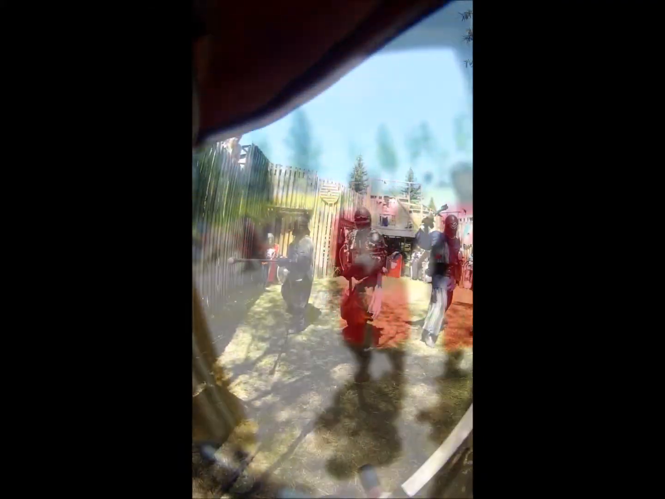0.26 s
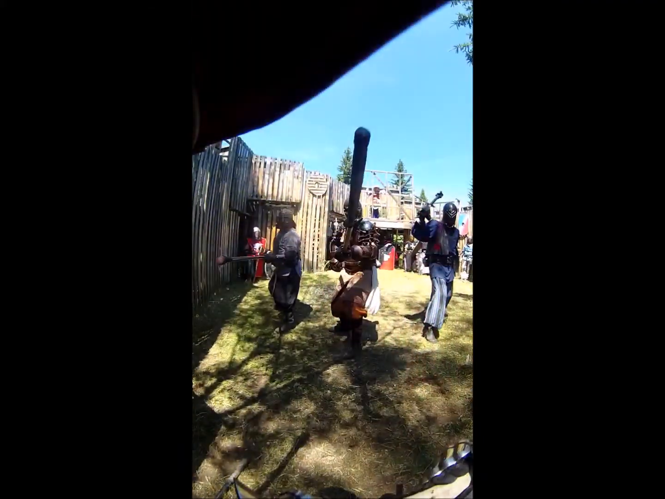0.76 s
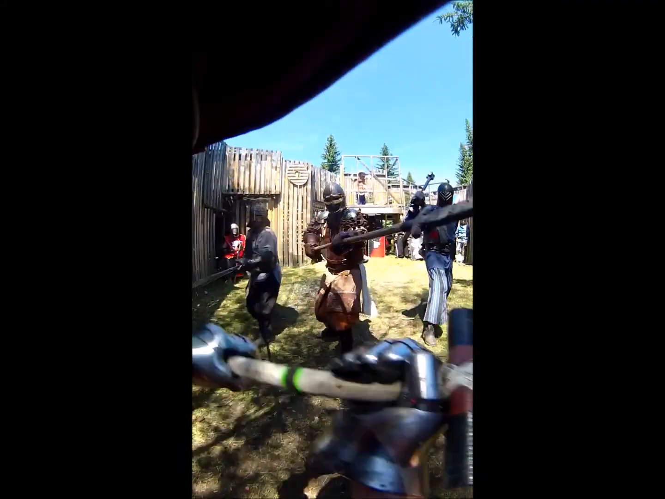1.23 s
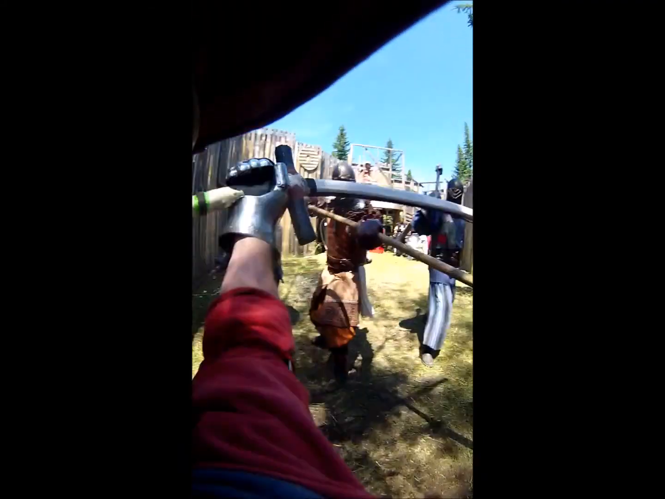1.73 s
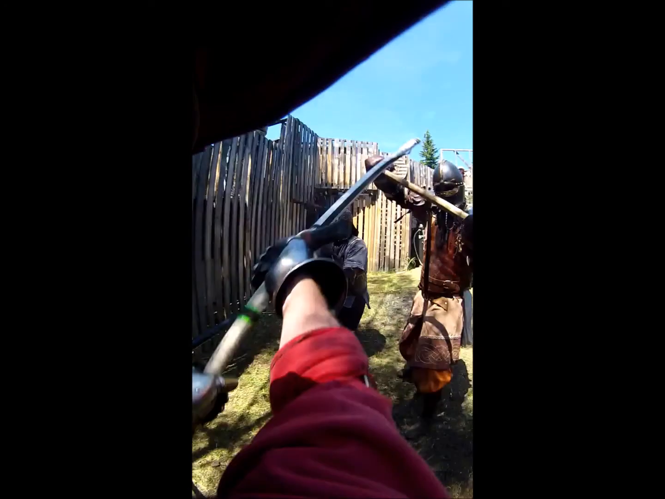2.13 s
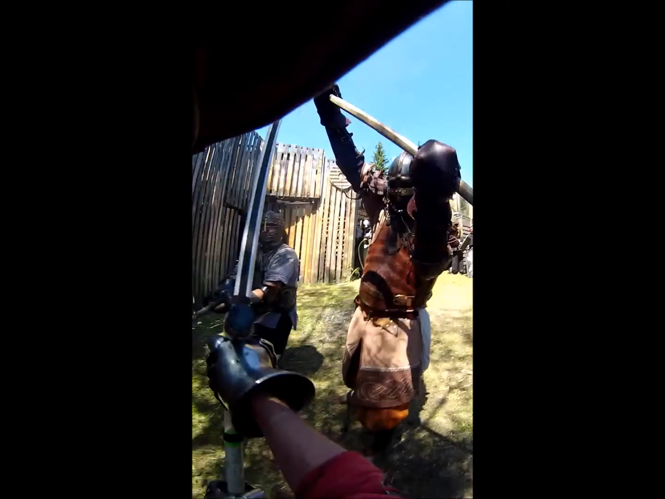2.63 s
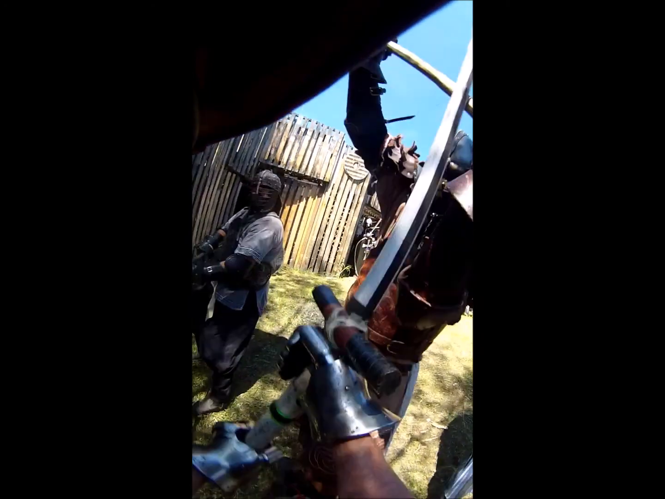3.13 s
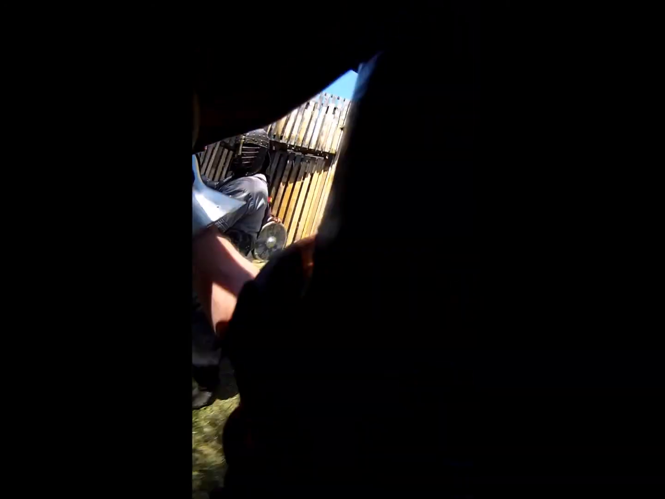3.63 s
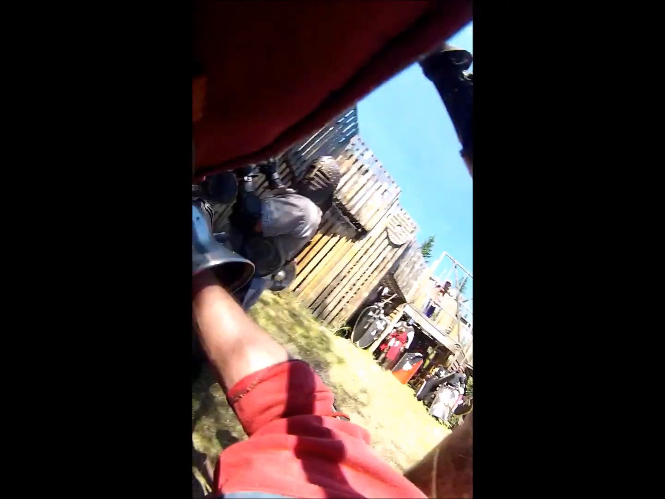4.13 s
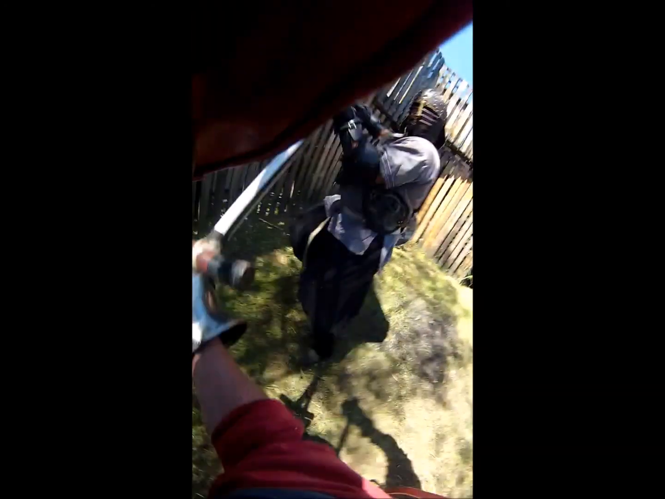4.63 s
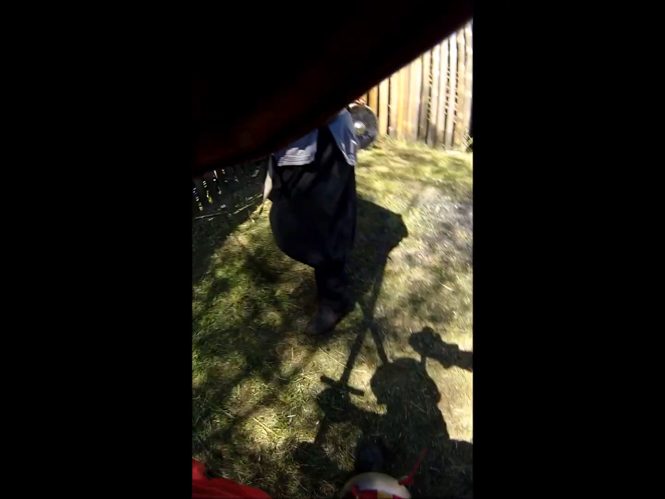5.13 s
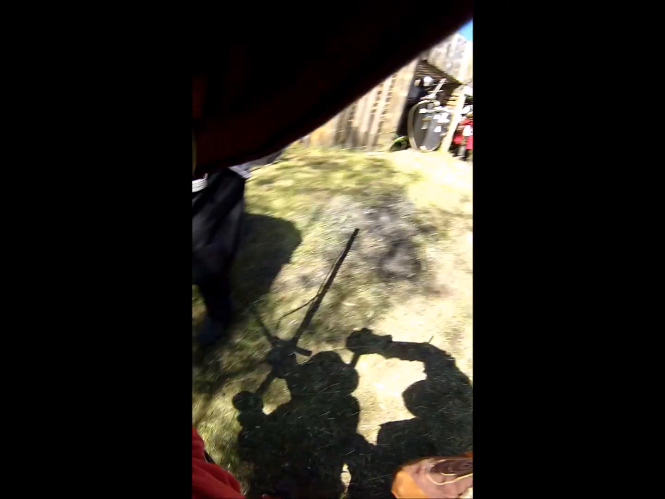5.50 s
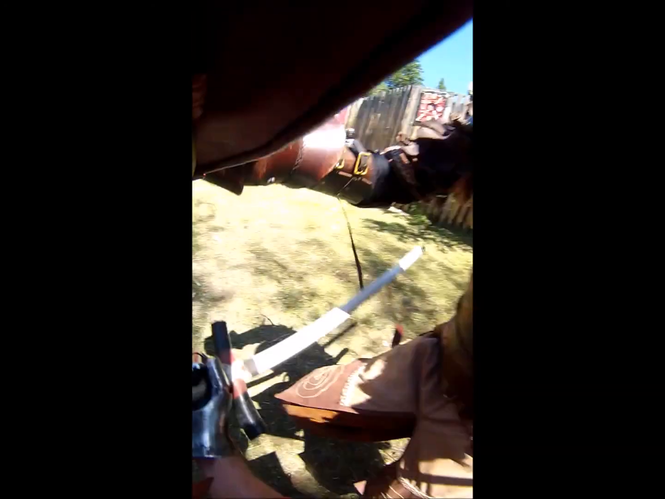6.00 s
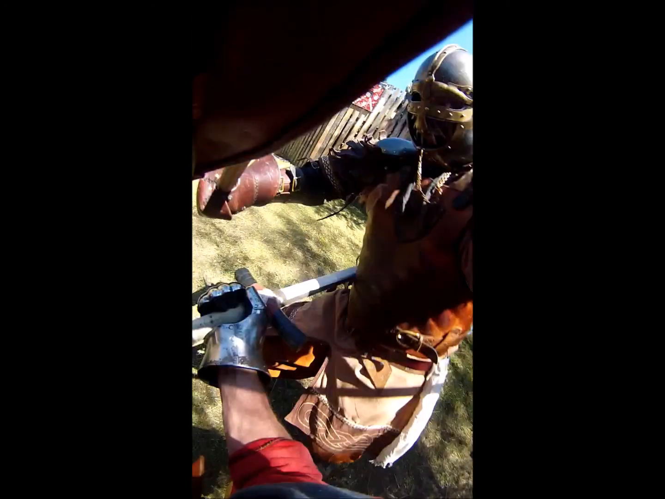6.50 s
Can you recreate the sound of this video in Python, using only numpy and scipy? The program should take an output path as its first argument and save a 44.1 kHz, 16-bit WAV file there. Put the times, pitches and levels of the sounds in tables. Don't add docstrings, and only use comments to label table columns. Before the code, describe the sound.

Outdoors, close to a helmet-mounted microphone, wooden shafts knock and tick sharply against shield and steel amid buffeting wind and a steady buzz. Almost at once everything drops much lower and slower: a swung shaft hums downward, plates clank, deep thumps land on padding, then a dense run of heavy blows, clinks and scrapes. Lulls with faint rustle and a far drone lead to one last heavy hit. The sound is coarse, clipped and gritty.

```python
import sys
import numpy as np
from scipy import signal
from scipy.fft import rfft, irfft, next_fast_len
from scipy.io import wavfile
from scipy.ndimage import uniform_filter1d, map_coordinates

SR = 44100
rng = np.random.default_rng(int(sys.argv[2]) if len(sys.argv) > 2 else 0)


def convert_level_to_amplitude(level_db):
    exponent = np.asarray(level_db, float) / 20
    return 10 ** exponent


def dump_mix(stems):
    frames = np.atleast_2d(stems).T
    limited = np.clip(frames, -1, 1)
    pcm = np.round(limited * 32767).astype(np.int16)
    wavfile.write(sys.argv[1], SR, pcm)


N = 298020
SLOW_START_S = .766
CROSSFADE_S = .003

FAST_BLOWS = [
    (0.075, -12, 417, -24),
    (0.3, -9.5, 795, -11),
    (0.305, -4, 460, -21),
    (0.316, -4.5, 400, -21),
    (0.339, -8.5, 428, -13),
    (0.52, -25, 424, -12.5),
]
FAST_TICKS = [
    (0.0423, -24, 2600, 1),
    (0.3127, -11, 3280, -18),
    (0.3613, -15, 3190, -6.5),
    (0.449, -32, 4570, 0),
    (0.4745, -14, 4850, -10),
    (0.6, -5, 3990, 0),
    (0.608, -9, 2600, -3),
    (0.6335, -14, 4900, -3),
    (0.687, -15, 4900, -3),
]
HEAVY_BLOWS = [
    (3.1235, -6.5, 290, -14),
    (4.137, -7, 299, -19),
    (6.344, -15.5, 603, -10),
]
LONG_BLOWS = [
    (5.349, -15, 291.7, -8.5),
    (4.77, -3, 290, -8),
    (6.363, -4, 210, -13),
]
THUMPS = [
    (3.382, -11.5, 81, -19.5),
    (3.393, -4, 103, -21),
    (3.7385, -2.5, 71.8, -27),
    (4.192, -24, 79, -11),
    (4.29, -30, 97, -11.5),
]
JOLTS = [
    (1.63, -18, 45, -29),
    (4.14, -17, 47, -13.5),
    (4.501, -21, 41.4, -33),
    (4.771, -12, 57, -29),
    (6.345, -17, 110, -22),
    (4.52, -19, 70, -25),
]
KNOCKS = [
    (1.636, -21, 295, -4),
    (3.744, -5, 200.4, -6.5),
    (3.757, -17.5, 229, -6),
    (3.913, -19, 189.3, -24),
    (4.54, -8.5, 167.5, -19.5),
    (4.672, -20, 393, -6),
    (4.0, -19.5, 643, -9.5),
    (4.232, -26.5, 299, -5.5),
]
SHOVES = [
    (4.479, -17.5, 182.5, -23),
    (4.517, -20, 203.4, -19),
    (5.063, -12.5, 239, -19.5),
    (5.414, -25.5, 244.3, -0.5),
    (5.502, -29, 231, -29),
    (6.039, -22.5, 276.4, -15),
]
CLINKS = [(0.916, -23.5, 1258, -5), (1.676, -3.5, 1237, -11), (3.255, -17.5, 1282, -11.5),
          (1.709, -24, 1210, 2.5), (1.735, -16.5, 1240, -14), (4.013, -12, 1150, -10),
          (4.021, -12.5, 1220, -8), (4.027, -14, 1250, -10.5), (4.05, -12, 1080, -6.5),
          (4.072, -13.5, 1120, -3), (4.087, -22, 1200, -4.5), (4.1, -23, 1155, -1), (4.113, -24, 1150, -7),
          (4.208, -32.5, 1020, -12)]
RINGS = [
    (1.673, -9, 895, -4.5),
    (2.068, -31, 1255, -3),
    (2.205, -16.5, 1106, -21),
    (2.218, -22, 1080, -15),
    (2.852, -30, 1268, -7),
    (3.972, -21, 1170, -13),
    (4.029, -31.5, 1170, -28),
    (5.194, -45, 1070, -19),
]
SHORT_STRIKES = [(1.627, -20, 1250, -10), (1.636, -9, 1200, -8), (1.6565, 1, 1162, -12.5), (1.663, -4, 1200, -15),
                 (4.193, -22, 800, -2), (4.831, -11, 283.6, -7.5), (3.1205, 1, 853, -25), (3.1325, -2, 410, -24),
                 (3.16, -28, 500, -6), (3.383, -17, 700, -5), (3.739, -7, 757, -6), (4.139, 7.5, 724, -14.5),
                 (4.233, -24.5, 770, -1), (4.519, -16, 807, -12), (4.767, -12, 500, -6), (4.8325, -15, 900, -6),
                 (5.07, -29, 750, 1), (5.351, -19, 924, -10), (5.744, -44, 560, 0), (4.6605, -10, 1345, -9.5),
                 (4.667, -5, 530, -15), (4.777, -5, 1400, -6), (4.784, -6, 1350, -6), (4.819, -21, 1350, -11),
                 (3.7475, -9, 1330, -6), (3.757, -24, 1210, -9), (3.767, -22, 1190, -14), (3.776, -20, 1320, -4),
                 (6.3625, -7, 1356, -4), (6.381, -5, 1290, -7.5)]

FAST_GRIND = [
    (0.6, -13.5, .002, .003, 0.12),
    (0.63, -26.5, 0.026, .12, .1),
]
STEEL_SCRAPES = [(1.69, -31, 0.0044, 0.043, 0.35), (3.14, -40, .005, .05, .2), (3.775, -37, .005, .03, .2),
                 (3.975, -24, 0.023, 0.025, 0.093), (4.045, -26, 0.0032, 0.063, .1),
                 (4.797, -28, .004, 0.047, 0.36), (5.07, -32.5, .005, 0.033, 0.33),
                 (5.17, -39.5, 0.019, .005, 0.11), (5.37, -25.5, 0.0094, 0.0079, 0.35),
                 (6.376, -21.5, 0.0055, 0.0035, 0.071), (6.39, -27, .01, 0.0055, 0.51)]
SHIELD_SHUDDERS = [
    (3.76, -26.5, 0.0041, .005, 0.34),
    (4.675, -22, 0.0047, 0.006, 0.11),
    (4.795, -18.5, 0.0034, .002, 0.063),
    (4.81, -26, .01, 0.0046, 0.88),
    (5.07, -29, 0.0077, 0.025, 0.92),
    (5.367, -24, 0.0032, 0.0092, 0.49),
    (6.395, -27, .005, 0.071, 0.51),
]
MAIL_SHAKES = [
    (2.92, -40, .02, .03, .15),
    (5.2, -42, .03, .09, .15),
    (5.4, -36, .01, .03, .2),
    (5.745, -50, .01, .04, .3),
    (5.87, -45, .02, .12, .3),
    (6.03, -43, .01, .02, .15),
    (6.14, -39, .03, .13, .2),
    (6.42, -42, .02, .06, .2),
]
AIR_PUFFS = [
    (1.47, -28.5, 0.044, 0.07, 0.32),
    (3.0, -28.5, 0.052, .05, 0.31),
    (3.29, -31.5, 0.035, 0.045, .2),
]

STEEL_MODES = [(671, 200, -1.5), (1080, 480, -3), (1235, 210, 0.5)]
SHAFT_MODES = [(900, 390, 4.5), (1406, 440, 3.5), (1860, 300, -5.5), (3320, 700, -1.5), (3770, 310, -4.5),
               (4800, 190, -13.5)]
SHIELD_MODES = [(209, 27, 1.5), (262, 26, 4.5), (373, 36, -8)]
MAIL_MODES = [(1060, 70, 0), (1170, 60, 0)]

SWING_TONE = [(0.85, 172.8, -57), (0.952, 167.8, -40.5), (1.212, 146.6, -36), (1.304, 133.6, -46),
              (1.378, 125, -68), (1.4, 133, -52)]
LAST_SWING_TONE = [(5.92, 95.5, -45), (6.002, 106, -39), (6.24, 107, -34), (6.29, 97.5, -41.5),
                   (6.33, 98.5, -44)]
PLATE_SONG = [(6.05, 662, -49), (6.074, 678, -45.5), (6.33, 680, -45)]
FAR_DRONE = [(5.5, 190.9, -50.5), (5.95, 189.3, -50.5), (6.3, 189.4, -47), (6.5, 192.5, -42),
             (6.76, 190.4, -43)]

# (time [s], level [dB], high overtones over low as the head faces it [dB])
BUZZ_FAST = [(0.0, -33.5, -12.5), (0.144, -33.5, -23), (0.2, -36.5, -2.5), (0.49, -34.5, -6),
             (0.525, -35, -16), (0.56, -36, -6), (0.62, -37.5, -9), (0.8, -32, -12)]
BUZZ_SLOWED = [(0.73, -41.5, -4.5), (1.22, -34.5, -11), (1.6, -37.5, -2), (1.9, -46.5, -6.5),
               (2.15, -47, -5), (2.25, -38.5, -2.5), (2.4, -45.5, -15.5), (2.5, -39.5, -0.5),
               (3.05, -53.5, -4)]
# (time [s], rate [Hz])
PULSE_FAST = [(0, 133.3), (.25, 133), (.765, 132.6)]
PULSE_SLOWED = [(.77, 33.92), (1.65, 33.88), (1.95, 34.1), (3.05, 34.15)]
# (pitch [Hz], level [dB])
OVERTONES_FAST = [(398.4, -39), (796.7, -51), (1195, -42), (1330, -46.5), (1464, -47.5), (1599, -42.5),
                  (1728, -50.5), (1863, -35.5), (2132, -49.5), (2196, -56), (2659, -52), (2929, -59.5),
                  (3192, -54), (3456, -60.5), (3596, -52), (3720, -51), (3989, -47.5), (4129, -51.5),
                  (4387, -56.5), (4522, -51), (4657, -61), (5050, -46.5), (5329, -66.5), (5582, -67)]
OVERTONES_SLOWED = [(269.2, -53.5), (339.1, -34.5), (403.7, -42), (441.4, -59), (473.7, -34.5),
                    (543.7, -57.5), (576.0, -63), (608.3, -64), (678.3, -81), (780.6, -55.5), (812.9, -68),
                    (845.2, -72), (915.2, -51.5), (947.5, -65.5), (985.1, -56), (1017, -47.5), (1050, -55),
                    (1120, -46), (1152, -44.5), (1184, -50), (1222, -47)]
# (time [s], share [0-1])
PULSE_BLUR = [(0, 0.95), (1.28, 0.97), (1.4, 0.52), (1.7, 0.4), (2.0, 1), (6.76, 1)]

# (time [s], wind on the microphone [dB], effort of the fighters [dB])
MOTION_FAST = [(0.0, -21, -35.5), (0.1, -21, -37.5), (0.26, -26.5, -40), (0.3, -23, -32),
               (0.49, -22, -36.5), (0.52, -22.5, -34.5), (0.69, -28, -25.5), (0.8, -29, -23.5)]
MOTION_SLOWED = [(0.73, -35.5, -40), (1.23, -33, -40), (1.55, -34.5, -39.5), (1.92, -28.5, -34.5),
                 (2.2, -32, -38), (2.8, -35.5, -38), (3.25, -40, -38.5), (3.5, -30.5, -41.5),
                 (3.95, -36, -44.5), (4.14, -29.5, -31.5), (4.5, -40.5, -52.5), (4.66, -38, -34),
                 (4.95, -30.5, -39.5), (5.3, -41.5, -38.5), (5.68, -41, -47), (5.86, -40, -43),
                 (5.92, -35, -39), (6.06, -33, -32.5), (6.5, -29.5, -30), (6.76, -46, -50)]
WIND_FAST = [(12, -40.5), (30, -5.5), (60, -3.5), (100, -1.5), (160, -6), (270, -12.5), (400, -17.5),
             (600, -48.5)]
WIND_SLOWED = [(8, -18.5), (22, 1), (60, -4.5), (130, -9.5), (200, -33.5), (400, -66)]
CLOTH_FAST = [(200, -31.5), (430, -3.5), (700, -3), (1100, -4.5), (1800, -16.5), (2300, -15), (3600, -46)]
CLOTH_SLOWED = [(60, -43), (140, -7), (230, 1.5), (330, 2), (470, -2.5), (560, -33), (900, -53)]
RUSTLE_FAST = [(1000, -31), (2100, -3), (3200, -3), (4200, -4.5), (5000, -13), (5600, -3), (6000, -2),
               (7200, -28)]
RUSTLE_SLOWED = [(250, -27.5), (520, -6), (800, -8), (1050, -3), (1250, -3), (1400, -5), (1500, -7),
                 (1800, -24.5)]

# (time [s], depth [dB])
GAIN_DUCKS = [(1.699, 9), (3.13, 2), (3.41, 3.5), (3.76, 1), (4.2, 8.5), (4.8, 11.5), (5.4, 14), (6.419, 7)]
# (time [s], level [dB])
FAINT_SNAPS = [(1.659, -47), (3.124, -35), (3.7395, -40), (4.1397, -28), (4.67, -43), (4.7745, -29),
               (4.833, -51), (5.357, -50)]


def unit(x):
    return x / np.sqrt(np.mean(x ** 2) + 1e-20)


def curves(rows):
    s, *columns = np.transpose(rows)
    t = np.arange(N) / SR
    return [np.interp(t, s, column) for column in columns], (t >= s[0]) & (t <= s[-1])


def wobble(rate):
    coarse = np.linspace(0, N, num=N // 32)
    knots = rng.standard_normal(int(N * rate / SR) + 4)
    return np.interp(np.arange(N), coarse, map_coordinates(knots, [coarse * rate / SR]))


def filtered(x, response):
    m = next_fast_len(len(x) + 8192)
    return irfft(rfft(x, m) * response(np.fft.rfftfreq(m, 1 / SR)), m)[:len(x)]


def levelled(x, seconds, share):
    width = int(seconds * SR)
    swell = np.abs(uniform_filter1d(uniform_filter1d(x ** 2, size=width), size=width))
    return unit(x / (swell + 1e-20) ** (np.clip(share, 0, 1) / 2))


def strokes(rows):
    t = np.arange(N) / SR
    total = 0
    for s, db, rise, hold, t60 in rows:
        decay_db = 60 * np.maximum(t - s - rise - hold, 0) / t60
        total = total + convert_level_to_amplitude(db - decay_db) * np.clip((t - s) / rise, 0, 1) ** 2
    return total


def plates(x, modes, speed, flat):
    def response(f):
        total = flat
        for centre, width, db in modes:
            damping = 1j * f * width * speed
            total = total + convert_level_to_amplitude(db) * damping / ((centre * speed) ** 2 - f * f + damping)
        return total
    return filtered(x, response)


def lasting(rows, contact_s, t60_s):
    return [row + (contact_s, t60_s) for row in rows]


def blows(rows, speed, drive_db, crack):
    body, rattle = np.zeros(N + SR), np.zeros(N + SR)
    t = np.arange(SR // 4) / SR
    onset = 1 - np.exp(-t * speed / 0.0017)
    burst = 1 + crack * np.exp(-t * speed / 0.0013)
    for s, db, hz, rattle_db, contact, t60 in rows:
        slip, shake = rng.standard_normal((2, len(t)))
        shape = convert_level_to_amplitude(db + drive_db - 60 * np.maximum(t - contact, 0) / max(t60, .005))
        drift = 0.93 * unit(uniform_filter1d(slip, size=SR // 100 // speed))
        turn = 2 * np.pi * hz * t
        ring = np.sin(turn + drift) + 0.33 * np.sin(turn + 2.4 * drift)
        start = round(s * SR)
        body[start:][:len(t)] += shape * onset * ring / 1.15
        rattle[start:][:len(t)] += shape * convert_level_to_amplitude(rattle_db) * burst * shake
    return body[:N] + 2.35 / np.sqrt(speed) * plates(rattle[:N], STEEL_MODES, speed, flat=0.69)


def scrape(spans, modes, lo_hz, hi_hz, clump_db, rate, flat):
    slips = rng.standard_normal(N) * convert_level_to_amplitude(clump_db * wobble(rate) + 2.9 * wobble(6 * rate))
    ringing = plates(slips, modes, 0.99, flat)
    band = filtered(ringing, lambda hz: 1 / (1 + (lo_hz / (hz + 1)) ** 4) * (hz < hi_hz))
    return strokes(spans) * levelled(band, seconds=2.6 / rate, share=0.47)


def swing(rows):
    (hz, db), on = curves(rows)
    on = uniform_filter1d(on * 1., size=SR // 30)
    level = convert_level_to_amplitude(db + 2.0 + 1.2 * wobble(8.3))
    return on * level * np.sin(2 * np.pi * np.cumsum(hz) / SR + 0.71 * wobble(18.3))


def buzz(rows, pulse, tones, order):
    (low_db, facing_db), on = curves(rows)
    rate = curves(pulse)[0][0] * (1 + .0006 * wobble(5))
    turn = 2 * np.pi * np.cumsum(rate) / SR
    blur = curves(PULSE_BLUR)[0][0]
    base_hz = pulse[0][1]
    low = [row for row in tones if row[0] < order * base_hz]
    high = [row for row in tones if row[0] >= order * base_hz]
    x = 0
    for level_db, group in ((low_db, low), (low_db + facing_db, high)):
        top = max(db for _, db in group)
        for hz, db in group:
            k = round(hz / base_hz)
            late = blur * np.angle(np.exp(1j * np.pi * k * k / 3))
            late = late + rng.uniform(0, 2 * np.pi) * (k < order)
            x = x + convert_level_to_amplitude(level_db + db - top + 1.5 * wobble(5.56)) * np.sin(k * turn + late)
    return on * np.sqrt(2) * x


def rush(spectrum, lumpy_db, rate):
    f, db = np.transpose(spectrum)
    x = filtered(rng.standard_normal(N), lambda hz: convert_level_to_amplitude(np.interp(np.log(hz + 1), np.log(f), db)))
    return unit(levelled(x, seconds=0.7 / rate, share=0.64) * convert_level_to_amplitude(lumpy_db * wobble(rate)))


def background(rows, wind, cloth, rustle, speed, over_db, grows):
    (wind_db, cloth_db), on = curves(rows)
    middle_db = -38
    rustle_db = middle_db + over_db + grows * (cloth_db - middle_db)
    x = convert_level_to_amplitude(wind_db) * rush(wind, lumpy_db=3.0, rate=9 * speed)
    x = x + convert_level_to_amplitude(cloth_db) * rush(cloth, lumpy_db=1.5, rate=45 * speed)
    x = x + convert_level_to_amplitude(rustle_db) * rush(rustle, lumpy_db=2.5, rate=60 * speed)
    return on * x


def ducking():
    attack_s, recover_s = 0.016, 0.47
    s, depth_db = np.transpose(GAIN_DUCKS)
    late = np.maximum(np.arange(N) / SR - s[:, None], 0)
    return convert_level_to_amplitude(-depth_db @ ((1 - np.exp(-late / attack_s)) * np.exp(-(late / recover_s) ** 2)))


def full_speed():
    hits = lasting(FAST_BLOWS, 0.0041, 0.057) + lasting(FAST_TICKS, 0.001893, 0.035)
    x = blows(hits, 4, drive_db=-7.0, crack=1.0)
    x = x + scrape(FAST_GRIND, SHAFT_MODES, 400, 7300, clump_db=0.5, rate=150, flat=0.17)
    x = x + buzz(BUZZ_FAST, PULSE_FAST, OVERTONES_FAST, order=33)
    return x + background(MOTION_FAST, WIND_FAST, CLOTH_FAST, RUSTLE_FAST, 2.9, over_db=-1.5, grows=-.3)


def slow_motion():
    heavy = lasting(HEAVY_BLOWS, 0.01, 0.033) + lasting(LONG_BLOWS, 0.023, 0.032)
    deep = lasting(THUMPS, 0.0047, 0.088) + lasting(JOLTS, 0.013, 0.043)
    small = lasting(KNOCKS, 0.0029, 0.077) + lasting(SHOVES, 0.019, 0.058)
    small = small + lasting(CLINKS, 0.007, 0.05) + lasting(RINGS, 0.0052, 0.054) + lasting(SHORT_STRIKES, 0.0027, 0.016)
    x = blows(heavy, 1, drive_db=2.5, crack=0.51)
    x = x + blows(deep, 1, drive_db=0.1, crack=1.1)
    x = x + blows(small, 1, drive_db=-3.5, crack=0.48)
    x = x + scrape(STEEL_SCRAPES, STEEL_MODES, 480, 2100, clump_db=-1.0, rate=140, flat=0.1)
    x = x + scrape(SHIELD_SHUDDERS, SHIELD_MODES, 130, 520, clump_db=2.0, rate=70, flat=0.069)
    x = x + scrape(MAIL_SHAKES, MAIL_MODES, 600, 1900, clump_db=2.5, rate=40, flat=0.06)
    x = x + sum(map(swing, (SWING_TONE, LAST_SWING_TONE, PLATE_SONG, FAR_DRONE)))
    x = x + strokes(AIR_PUFFS) * rush(WIND_SLOWED, lumpy_db=4.0, rate=8.92)
    around = buzz(BUZZ_SLOWED, PULSE_SLOWED, OVERTONES_SLOWED, order=22)
    around = around + background(MOTION_SLOWED, WIND_SLOWED, CLOTH_SLOWED, RUSTLE_SLOWED, 0.94, over_db=-3, grows=.9)
    return x + ducking() * around


def scene():
    return np.where(np.arange(N) < SLOW_START_S * SR, full_speed(), slow_motion())[None]


def held(x, rate, top):
    clip_level = .41
    x = filtered(x, lambda hz: 1 / (1 + (hz / (0.48 * rate)) ** 18))
    span = int(np.ceil(N / SR))
    samples = map_coordinates(x, [np.arange(span * rate) * SR / rate])
    samples = samples / (1 + np.abs(samples / clip_level) ** 12) ** (1 / 12)
    mirror = 1 + 2 * np.cos(2 * np.pi * rate * np.arange(N) / SR)
    x = signal.resample(samples, span * SR)[:N] * mirror
    return filtered(x, lambda hz: np.sinc(hz / rate) / (1 + (hz / top) ** 160))


def snaps():
    s, db = np.transpose(FAINT_SNAPS)
    ticks = np.bincount((s * SR).astype(int), convert_level_to_amplitude(db), minlength=N)
    return 20 * filtered(ticks, lambda hz: np.exp(-hz / 1500))


def band_limit(x):
    return signal.sosfilt(signal.butter(12, 16340, fs=SR, output="sos"), x)


def record(dry):
    t = np.arange(N) / SR
    slowed = np.arange(N) >= SLOW_START_S * SR
    fade = np.sin(np.pi / 2 * np.clip((SLOW_START_S - t) / CROSSFADE_S + .5, 0, 1)) ** 2
    quick = fade * held(dry[0], 12000, 15350)
    slow = held(dry[0] * slowed, 3000, 3850)
    mix = quick + slow + snaps()
    return band_limit(mix[None])


dry = scene()
out = record(dry)
dump_mix(out)
```